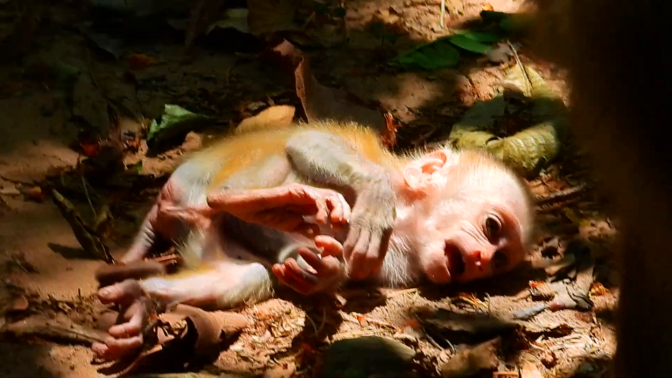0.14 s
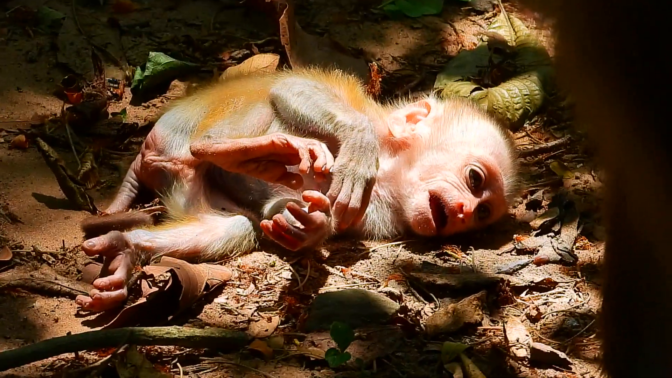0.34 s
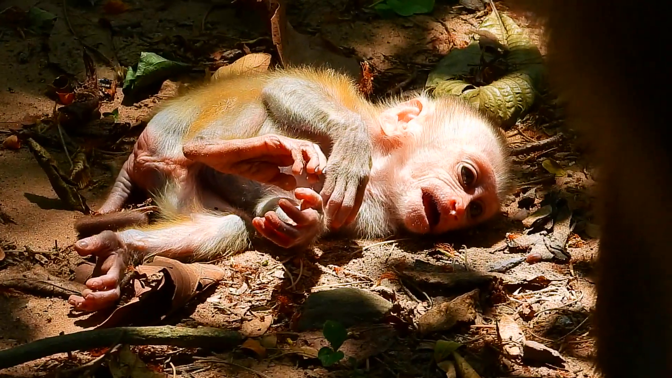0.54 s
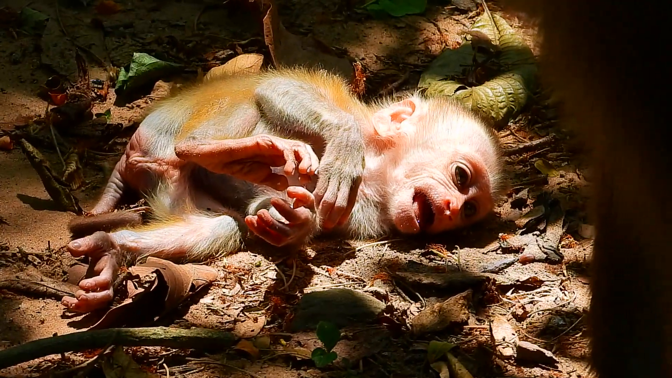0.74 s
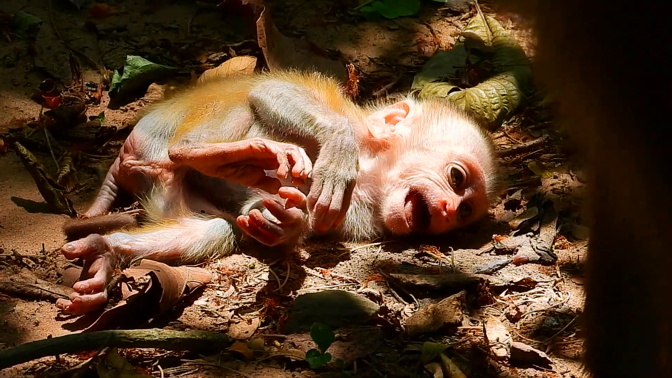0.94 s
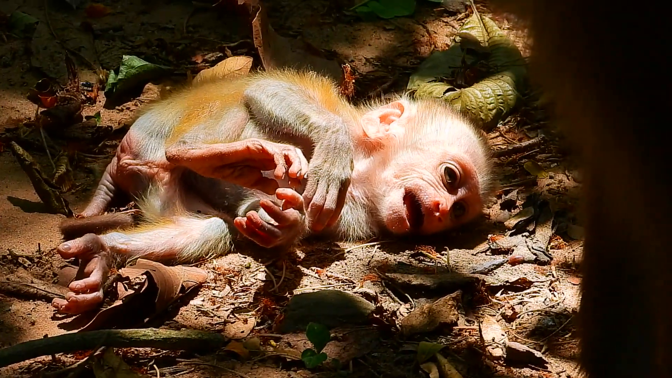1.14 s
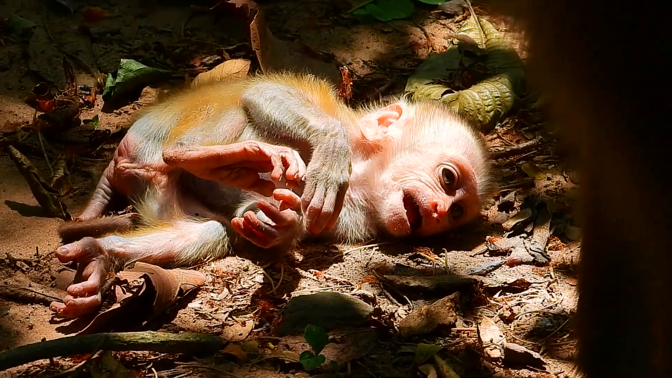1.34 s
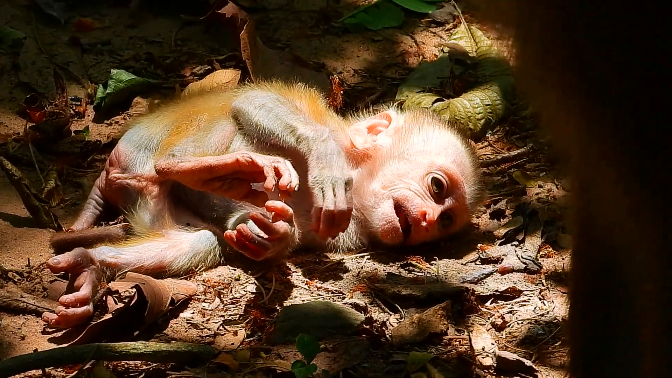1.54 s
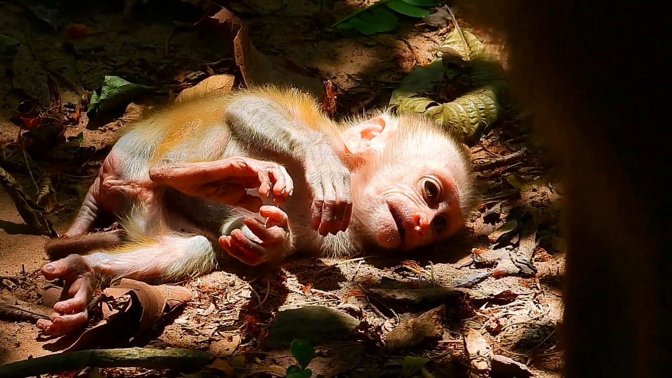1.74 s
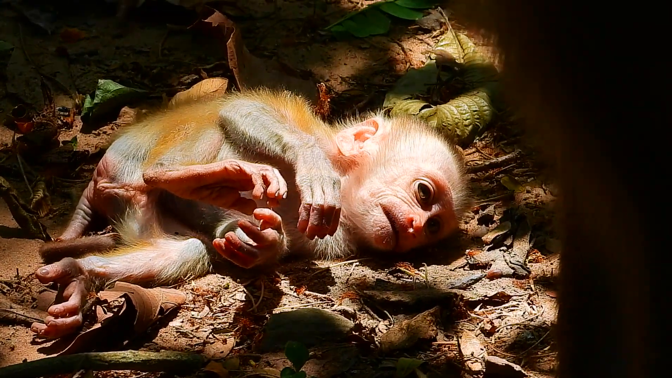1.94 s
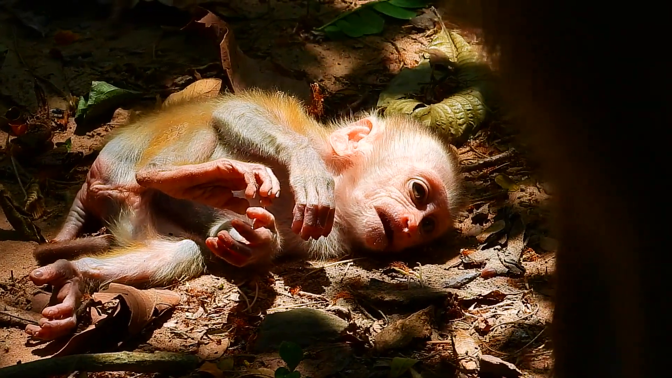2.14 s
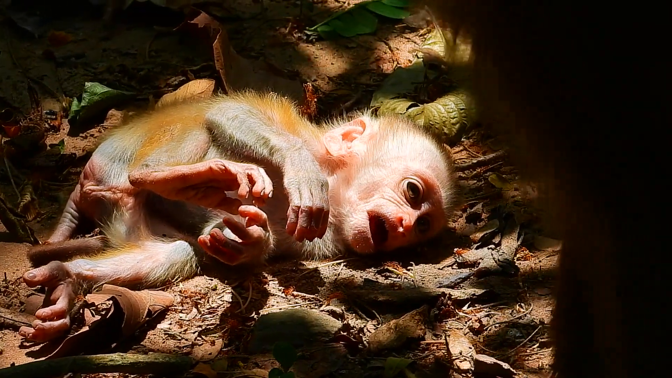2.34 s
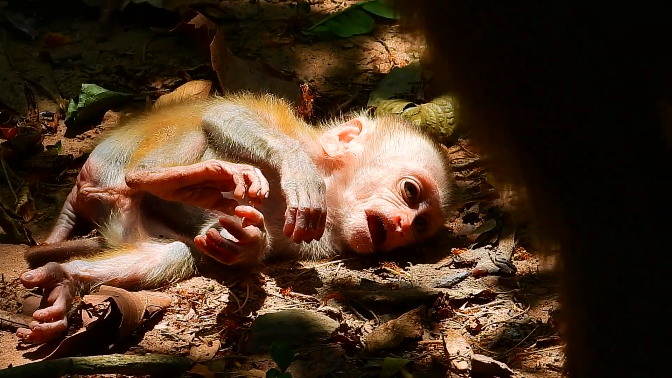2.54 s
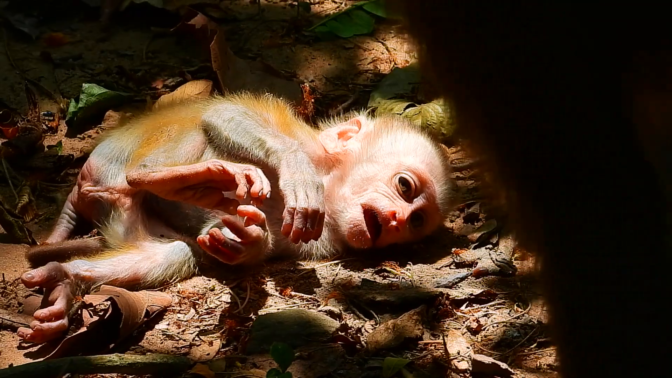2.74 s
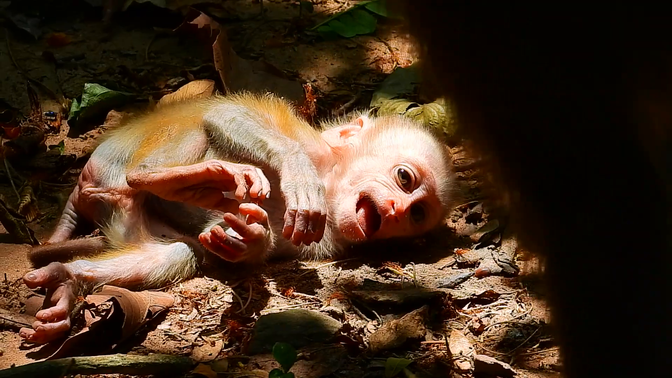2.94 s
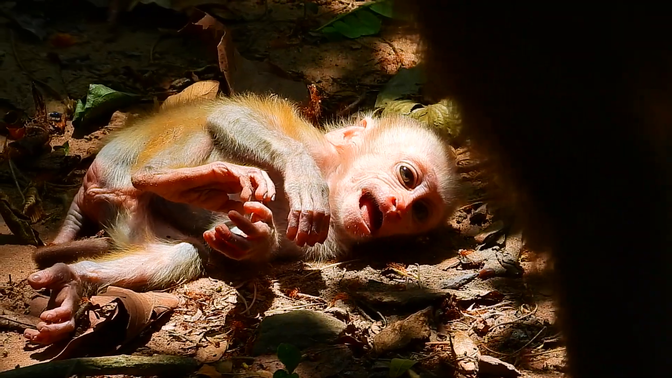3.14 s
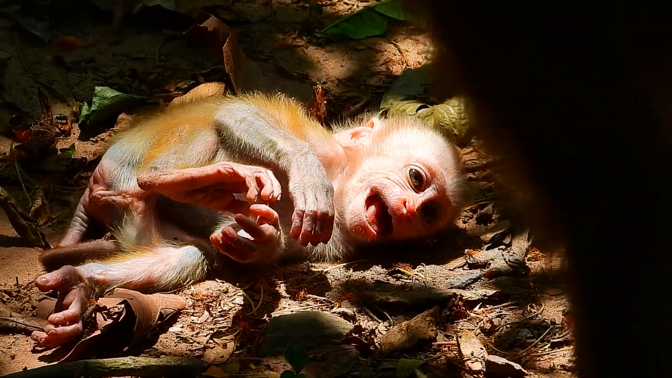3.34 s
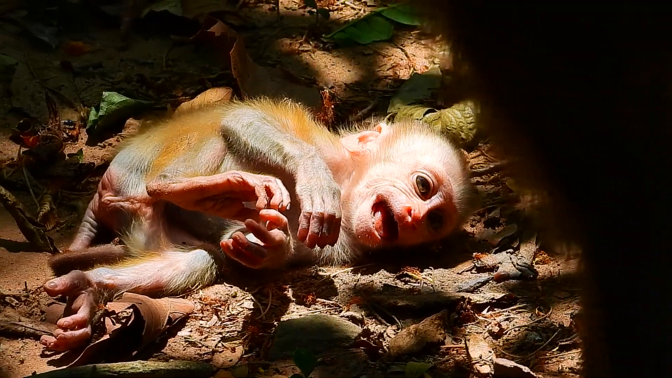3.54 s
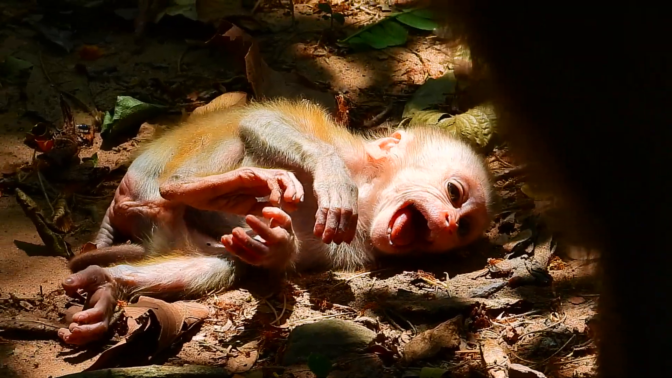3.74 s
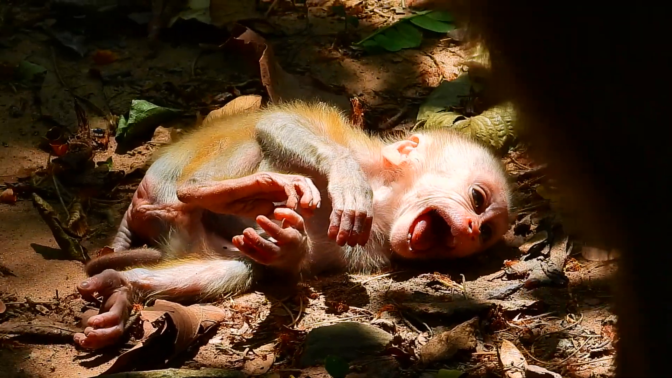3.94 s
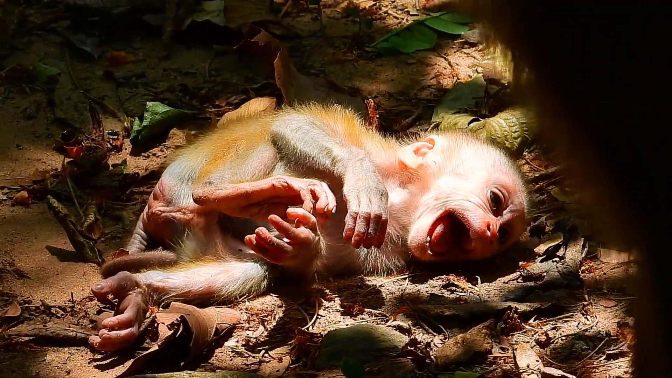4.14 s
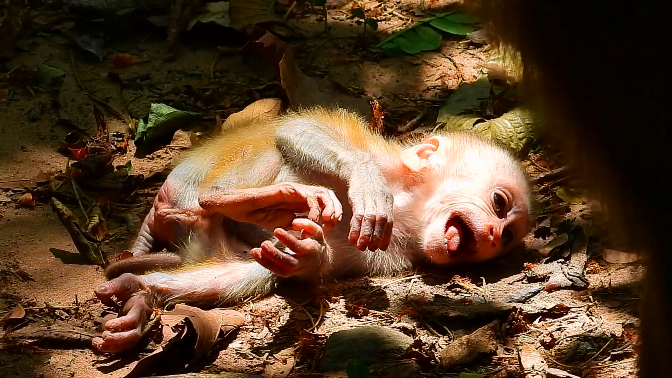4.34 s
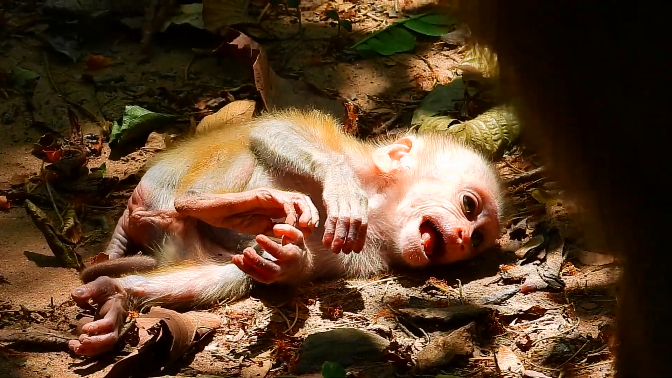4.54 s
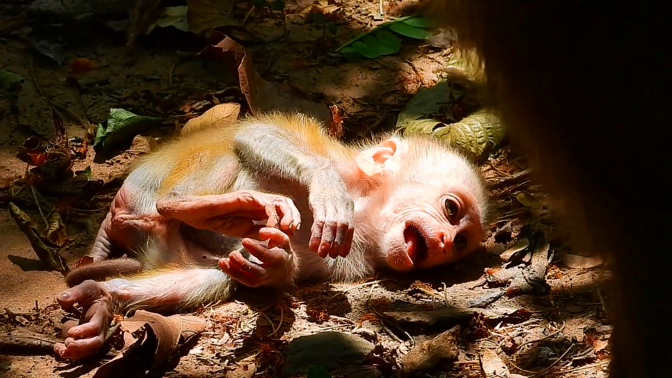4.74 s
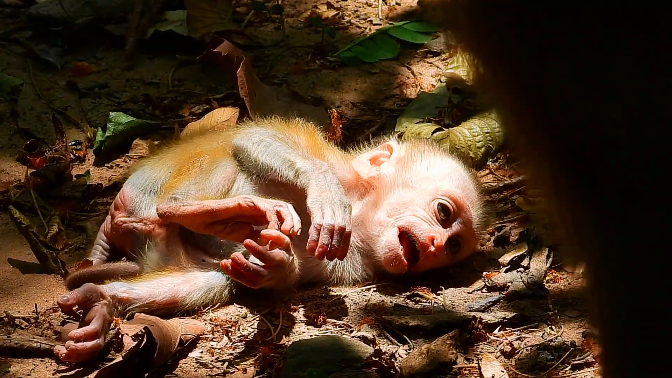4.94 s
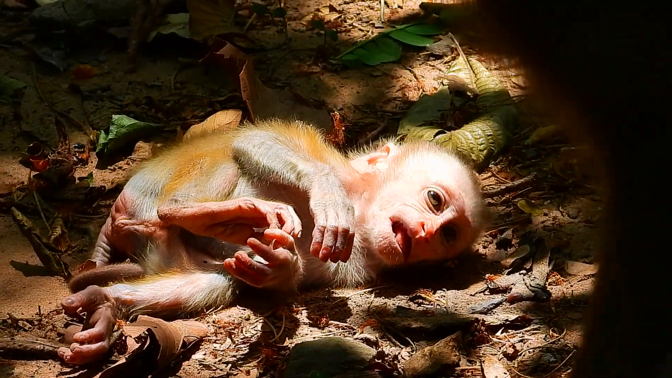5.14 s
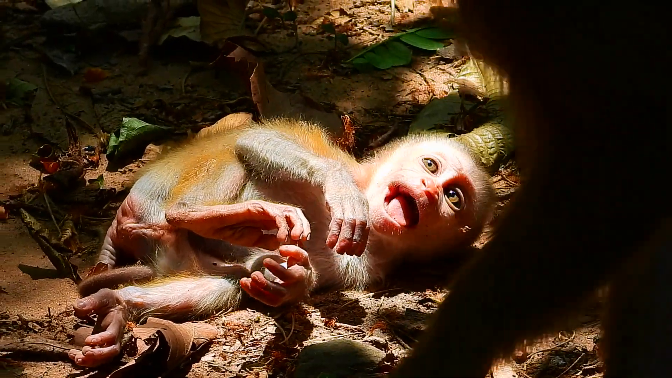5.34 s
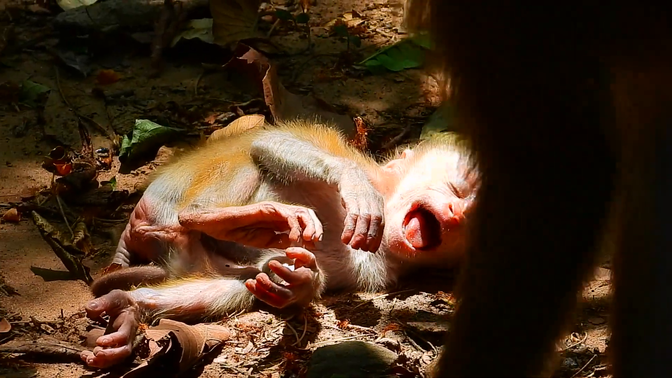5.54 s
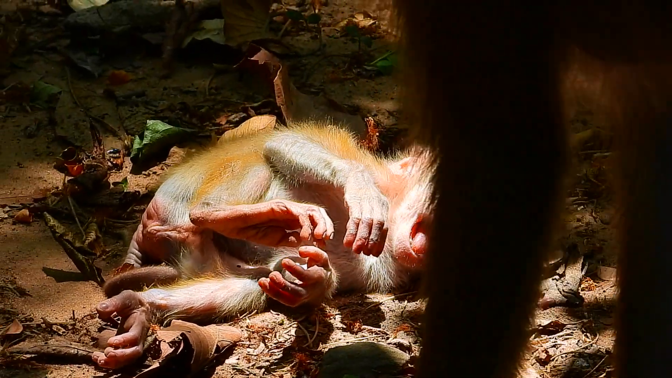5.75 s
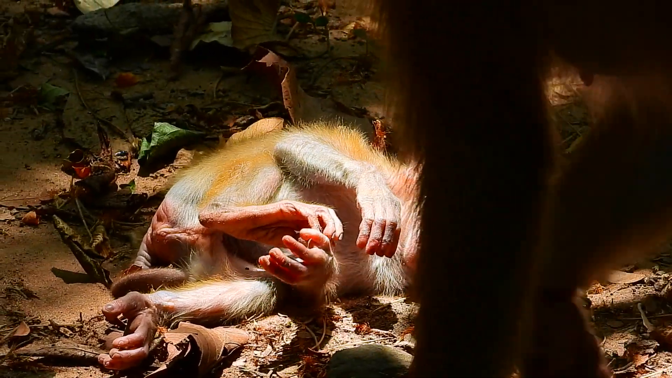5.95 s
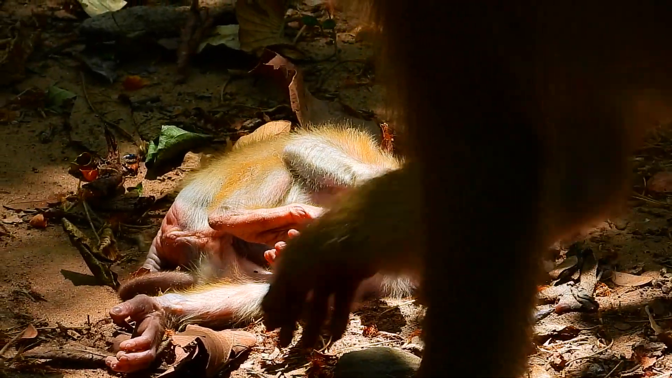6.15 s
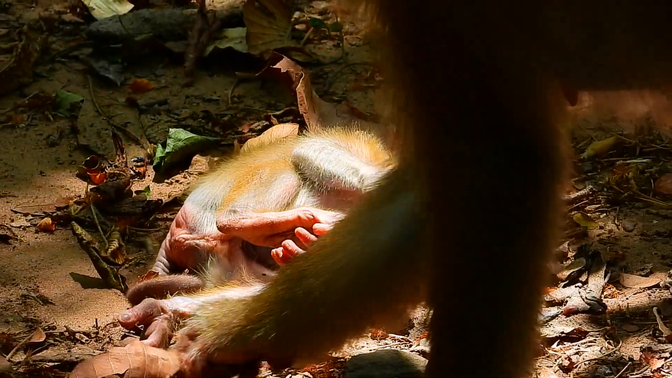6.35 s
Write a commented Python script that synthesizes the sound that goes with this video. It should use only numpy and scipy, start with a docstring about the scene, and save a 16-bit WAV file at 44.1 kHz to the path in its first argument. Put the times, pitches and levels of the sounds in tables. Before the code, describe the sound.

A forest clearing hisses softly, with a thin high insect whine and a low, throbbing engine far away. Close by, slightly left, a baby monkey grunts huskily around 0.4 and 0.6 s amid tiny leaf crackles, with a faint squeak at 0.7. A clear, piercing whistle-cry bursts out at 0.8 and falls away by 1.0. A grunt comes near 1.3, a dull twig knock at 1.5, and soft overlapping coos at 2.1-2.3. A wavering whimper runs 2.8-3.1, then a short rough shriek at 3.35. The longest scream, 3.6-4.3, soars and tears into buzzing rasps before dropping. Small grunts follow at 4.7-5.1. A shrill arched cry fills 5.3-5.6; a broken, raspy one 5.8-6.1, while an adult crunches through litter from about 5.9 to the end. Two thin falling peeps close at 6.2-6.3. The background ducks beneath loud cries and swells back; echoes are short.

```python
"""Forest floor, two microphones: a baby monkey lies close by on dry leaves, a little to the left.
It screams in shrill arches, a whistle that breaks into rasps of air and loose fold claps, with small
grunts, coos, peeps and a squeak between. Leaves crackle as clumped noise, a twig knocks, and an adult
steps past through the litter. Far off an engine thuds as a sum of blurred exhaust orders, under filtered
tree hiss and a high insect whine; this background dips during loud screams and swells back."""
import sys
import numpy as np
from scipy import signal
from scipy.fft import rfft, irfft, next_fast_len
from scipy.io import wavfile
from scipy.ndimage import uniform_filter1d

SR = 44100
rng = np.random.default_rng(int(sys.argv[2]) if len(sys.argv) > 2 else 0)


def bounce(signal):
    """Save signal as a 16-bit WAV file at the path given by the first command-line argument."""
    frames = np.transpose(np.atleast_2d(signal))
    limited = np.clip(frames, -1, 1)
    pcm = np.round(limited * 32767).astype(np.int16)
    wavfile.write(sys.argv[1], SR, pcm)


N = 281525
TIME = np.arange(N) / SR
# Table levels stand before echoes, left-right balance and background gain.


def amp(db):
    """Turns decibels into an amplitude factor."""
    return 10 ** (np.asarray(db) / 20)


def evened(x):
    """Scales to rms 1."""
    return x / np.sqrt(np.mean(x ** 2) + 1e-20)


def read(points, hz):
    """Reads a spectrum on a log-frequency axis."""
    f, value = np.transpose(points)
    return np.interp(np.log(hz + 1e-6), np.log(f), value)


def add(mix, start_s, sound):
    """Lays a sound into the mix at its start time."""
    part = mix[max(round(start_s * SR), 0):][:len(sound)]
    part += sound[:len(part)]


def span(start_s, end_s):
    """Sample times of a stretch."""
    return np.arange(start_s, end_s, 1 / SR)


def turns(hz):
    """Running phase (radians) of a changing frequency."""
    return 2 * np.pi * np.cumsum(hz) / SR


def faded(x, share):
    """Fades both ends; share is the part of the length spent fading."""
    return x * signal.windows.tukey(len(x), share)


def colour(x, points):
    """Filters by a spectrum; rms 1."""
    size = x.shape[-1]
    gain = amp(read(points, np.fft.rfftfreq(size, 1 / SR)))
    return evened(irfft(rfft(x) * gain, size))


def wander(t, hz):
    """Random drift up to a rate, over the times t; rms 1 before trimming to length."""
    size = next_fast_len(max(len(t), 1 << 13))
    f = np.fft.rfftfreq(size, 1 / SR)
    drift = irfft(rfft(rng.standard_normal(size)) / (1 + (f / hz) ** 4), size)
    return evened(drift)[:len(t)]


def hiss(t):
    """White noise over the times t."""
    return rng.standard_normal(len(t))


def patchy(x, depth_db, size, count):
    """Short-lived resonances come and go in patches two bins wide.

    Frames are size samples long; a patch lasts count frames."""
    overlap = 3 * size // 4
    z = signal.stft(x, nperseg=size, noverlap=overlap)[2]
    patches = uniform_filter1d(rng.standard_normal(z.shape[-2:]), size=2, axis=0)
    patches = uniform_filter1d(patches, size=count, axis=1)
    y = signal.istft(z * amp(depth_db * evened(patches)), nperseg=size, noverlap=overlap)[1]
    return y[..., :x.shape[-1]]


# Hiss of the trees all round: pitch_hz [Hz], relative level_db [dB]
AIR_SPECTRUM = [(30, -28), (70, -24), (150, -2.5), (300, -8), (500, -6.5), (950, -8.5), (1500, -8.5),
                (2060, -7.5), (2610, -13), (3550, -0.5), (5200, -5.5), (6870, -12), (7610, -8), (8570, -19),
                (12500, -32.5), (15000, -50)]
# Insect choruses: pitch_hz [Hz], nominal width_hz [Hz], level_db [dB]
INSECT_WHINE = [(1761, 217, -47.5), (3392, 440, -43), (7540, 270, -49)]
# Likeness of the left and right microphones: pitch_hz [Hz], likeness [-1 to 1]
LEFT_RIGHT_LIKENESS = [(100, 0.58), (300, 0.79), (1000, 0.79), (2000, 0.76), (4000, 0.56), (8000, 0.042),
                       (14000, 0.14)]


def forest(air_db=-38.5, flutter_db=0.55, patch_db=3.5):
    """Diffuse tree hiss and narrow bands of insect whine, partly alike at both microphones."""
    hz = np.fft.rfftfreq(N, 1 / SR)
    a, b = rfft(rng.standard_normal((2, N)))
    same = np.clip(read(LEFT_RIGHT_LIKENESS, hz), -1, 1)
    pair = np.array([a, same * a + np.sqrt(1 - same ** 2) * b])
    power = amp(2 * read(AIR_SPECTRUM, hz))
    power *= amp(2 * air_db) / power.mean()
    for centre, width, db in INSECT_WHINE:
        band = 1 / (1 + ((hz - centre) / (0.63 * width)) ** 2) ** 2
        power += amp(2 * db) * band / band.mean()
    air = patchy(irfft(pair * np.sqrt(power), N), patch_db, size=1024, count=10)
    return air * amp(flutter_db * wander(TIME, 5.0))


# Colour of the far exhaust pipe: pitch_hz [Hz], relative level_db [dB]
EXHAUST_SPECTRUM = [(25, -62), (70, -27), (100, -17), (123, -6), (148, -1), (173, 7), (197, 6), (222, -6),
                    (247, -7), (270, -28), (295, -6.5), (320, -8.5), (400, -37), (700, -35), (2000, -80)]
# Level of the far engine over time: time_s [s], level_db [dB]
ENGINE_COURSE = [(0, -41), (.4, -41.5), (.7, -37), (1, -42), (1.9, -42), (2.85, -41), (3.3, -48),
                 (4.2, -47), (4.65, -42.5), (5.3, -47), (6.38, -52.5)]
FIRINGS_HZ, SPEEDUP_HZ_PER_S = 24.48, .25  # starting rate; it slowly gathers speed
EXHAUST_HISS, ECHO_BLUR_RAD = .42, 1.1  # hiss relative to the hum; phase drift


def engine(swell_db=3.3):
    """Orders of a far exhaust pipe; shifting echoes blur its firings into a throbbing hum."""
    phase = turns(FIRINGS_HZ + SPEEDUP_HZ_PER_S * TIME)
    hum = np.zeros(N)
    for k in range(4, 14):
        level = amp(read(EXHAUST_SPECTRUM, k * FIRINGS_HZ) + swell_db * wander(TIME, 2.5))
        hum += level * np.cos(k * phase + ECHO_BLUR_RAD * wander(TIME, 0.44))
    sound = evened(hum) + EXHAUST_HISS * colour(hiss(TIME), EXHAUST_SPECTRUM)
    return amp(np.interp(TIME, *np.transpose(ENGINE_COURSE))) * evened(sound)


# Dips of the background: start_s [s], depth_db [dB], hold_s [s, counted from the start]
BACKGROUND_DIPS = [(0.842, 10, 0.23), (3.35, 13.5, .04), (3.684, 11, 0.64), (5.413, 12, 0.24),
                   (5.937, 13.5, 0.046)]
SINK_S, RECOVER_DB_PER_S, BACKGROUND_DB = 0.016, 9, 0.58


def sinking():
    """Gain of the background: a quick fall, a hold and a steady recovery at each dip."""
    down = []
    for s, depth_db, hold in BACKGROUND_DIPS:
        fall = np.clip((TIME - s) / SINK_S, 0, 1)
        recovered_db = RECOVER_DB_PER_S * np.maximum(TIME - s - hold, 0)
        down.append(fall * np.maximum(depth_db - recovered_db, 0))
    return amp(BACKGROUND_DB - np.max(down, axis=0))


def crackle(t, spectrum, clump_db=3):
    """Clumps of tiny snaps in dry leaves: noise whose level wanders fast."""
    return colour(hiss(t) * amp(clump_db * wander(t, 210)), spectrum)


# The adult wading through the litter: time_s [s], level_db [dB, before steps_db]
ADULT_STEPS = [(5.741, -86), (5.796, -55), (5.85, -70), (5.916, -42), (5.95, -51), (6.38, -45)]
# Colour of the litter underfoot: pitch_hz [Hz], relative level_db [dB]
LITTER_SPECTRUM = [(60, -54), (450, -3), (1000, -10.5), (3500, -17), (5000, -4.5), (6900, -1.5),
                   (8500, -4.5), (11000, -10.5), (13500, -17), (15000, -27)]


def adult_steps(steps_db=6):
    """Footfalls of the passing adult: litter noise that swells with each step."""
    out = np.zeros(N)
    s, db = np.transpose(ADULT_STEPS)
    t = span(s[0], TIME[-1])
    add(out, s[0], amp(np.interp(t, s, db) + steps_db) * crackle(t, LITTER_SPECTRUM, clump_db=0))
    return out


# Dry leaves pressed and brushed: start_s [s], length_s [s], level_db [dB]
LEAF_RUSTLES = [(0.402, 0.049, -37.5), (0.662, 0.031, -28), (0.706, 0.032, -38), (1.275, 0.098, -54),
                (2.147, 0.12, -42), (4.529, 0.11, -51.5)]
# Colour of the dry leaves: pitch_hz [Hz], relative level_db [dB]
LEAF_SPECTRUM = [(60, -38), (600, -23), (2500, 1), (4000, 8), (5700, 13.5), (7500, -1), (10000, -4.5),
                 (15000, -51)]


def rustles():
    """Short bursts of crackle from the leaves under the baby."""
    out = np.zeros(N)
    for s, length, db in LEAF_RUSTLES:
        add(out, s, amp(db) * faded(crackle(span(0, length), LEAF_SPECTRUM), .4))
    return out


# A twig knocking on the ground: start_s [s], level_db [dB]
TWIG_KNOCK = (1.502, -25.5)
# Modes of the twig: pitch_hz [Hz], relative level_db [dB], t60_s [s]
TWIG_MODES = [(500, -5, 0.037), (750, -8, 0.025), (1017, 1.5, 0.032), (1140, -4, 0.049), (1370, -5, .035),
              (2300, -15, .02)]


def knock():
    """One dull blow on dry wood: a few decaying modes with a soft onset."""
    t, out = span(0, .1), np.zeros(N)
    ring = np.zeros(len(t))
    for hz, db, t60 in TWIG_MODES:
        ring += amp(db - 60 * t / t60) * np.sin(2 * np.pi * (hz * t + rng.random()))
    start_s, level_db = TWIG_KNOCK
    add(out, start_s, amp(level_db) * ring * (1 - np.exp(-t / 0.0014)))
    return out


# Colour of the low calls: pitch_hz [Hz], relative level_db [dB]
LOW_VOICE_SPECTRUM = [(60, -44), (500, 1.5), (1100, 6), (1600, 11.5), (2300, -0.5), (3300, -3), (6000, 2.5),
                      (14000, -29)]


def low_voice(t, hz, rough):
    """The chest register: a few unsteady harmonics with a husky edge."""
    unsteady = 0.0072 * wander(t, 27.5) + (0.0015 + 0.076 * rough) * wander(t, 172)
    phase = turns(hz * (1 + unsteady))
    partials = sum(np.sin(k * phase) / np.sqrt(k) * amp(3.3 * wander(t, 17.5)) for k in range(1, 4))
    tone = colour(partials, LOW_VOICE_SPECTRUM)
    husk = colour(hiss(t), LOW_VOICE_SPECTRUM)
    return evened((1 - rough) * tone + 0.17 * rough * husk)


# Soft low calls: start_s [s], length_s [s], start pitch_hz [Hz], end pitch_hz [Hz],
# level_db [dB], roughness [0-1]
GRUNT_CALLS = [(0.394, 0.029, 1221, 1048, -33, 0.6), (0.397, 0.042, 1715, 1586, -34, 0.88),
               (0.63, 0.09, 1158, 1120, -33, 0.92), (0.798, 0.03, 995, 960, -42.5, 0.33),
               (1.265, 0.086, 1312, 973, -35.5, 0.77), (2.806, 0.029, 1864, 2300, -35, 0.6),
               (3.416, 0.027, 1320, 960, -40.5, 0.63), (3.431, 0.032, 2370, 2287, -34.5, 0.27),
               (4.732, 0.017, 1186, 1100, -33, 0.17), (4.744, 0.04, 1220, 1027, -38.5, 0.78),
               (4.909, 0.033, 1098, 1056, -44, 0.3), (5.065, 0.059, 658, 582, -42, 0.6)]


def grunts(out):
    """Short chest calls whose pitch glides in a straight line."""
    for s, length, start_hz, end_hz, db, rough in GRUNT_CALLS:
        t = span(0, length)
        voice = low_voice(t, np.linspace(start_hz, end_hz, len(t)), rough)
        add(out, s, amp(db) * faded(voice, .6))


# Two overlapping coos, one rising and one level: time_s [s], pitch_hz [Hz], level_db [dB]
COO_COURSES = [
    [(2.055, 684, -47), (2.087, 790, -37.5), (2.11, 900, -48), (2.143, 1040, -29.5), (2.172, 995, -32),
     (2.195, 1115, -32), (2.215, 1150, -33), (2.245, 1280, -43)],
    [(2.122, 1490, -51), (2.16, 1520, -49), (2.195, 1620, -49), (2.225, 1540, -40), (2.255, 1470, -39.5),
     (2.28, 1430, -40), (2.3, 1490, -47), (2.32, 1500, -54)],
]


def coos(out):
    """Smooth chest calls that follow a drawn pitch and level."""
    for course in COO_COURSES:
        s, hz, db = np.transpose(course)
        t = span(s[0], s[-1])
        add(out, s[0], amp(np.interp(t, s, db)) * low_voice(t, np.interp(t, s, hz), rough=0.12))


# Throat colour: frequency [multiple of the throat centre], relative level_db [dB]
THROAT_SPECTRUM = [(.02, -60), (.1, -52), (.135, -26), (.17, -16.5), (.23, -59), (.29, -26), (.35, -25),
                   (.44, -27), (.56, -28), (.72, -3), (.8, 0.5), (1.0, 1.5), (1.3, -2.5), (1.6, -9.5),
                   (2.2, -25), (3.2, -33)]


def throat(x, centre_hz):
    """Passes x through a throat whose resonances move together; rms 1."""
    hz, t, z = signal.stft(x, SR, nperseg=256, noverlap=192)
    centre = np.interp(t * SR, np.arange(len(x)), centre_hz)
    gain = amp(read(THROAT_SPECTRUM, hz[:, None] / centre))
    return evened(signal.istft(z * gain, SR, nperseg=256, noverlap=192)[1][:len(x)])


# Thin reedy peeps: start_s [s], length_s [s], start pitch_hz [Hz], end pitch_hz [Hz], level_db [dB]
PEEP_CALLS = [(6.217, 0.045, 2370, 2230, -39.5), (6.276, 0.044, 2380, 2180, -38)]


def peeps(out, jitter=0.0076, throat_hz=6500):
    """Soft falling calls with six equal harmonics shaped by the throat."""
    for s, length, start_hz, end_hz, db in PEEP_CALLS:
        t = span(0, length)
        phase = turns(np.linspace(start_hz, end_hz, len(t)) * (1 + jitter * wander(t, 300)))
        voice = throat(sum(np.sin(k * phase) for k in range(1, 7)), np.full(len(t), throat_hz))
        add(out, s, amp(db) * faded(voice, .6))


def fray(t, phase, width_hz=650):
    """Turbulent air around the whistle: a band of noise that follows its pitch."""
    return np.sin(phase) * wander(t, width_hz) + np.cos(phase) * wander(t, width_hz)


def whistle(t, hz, overtone_db, rough, jitter=0.0034, rough_jitter=0.0386, shimmer=0.12,
            third_db=-15, halves=0.48, flicker_db=2.0, frayed=0.27):
    """The fold edges whistle; strain unsteadies pitch and strength and doubles the period in fits."""
    slow_drift = (0.00437 + 0.017 * rough) * wander(t, 91)
    fast_drift = (jitter + rough_jitter * rough) * wander(t, 673)
    phase = turns(hz * (1 + slow_drift + fast_drift))
    # the mouth passes little of the upper partials when the pitch is very high
    mouth = 1 / (1 + (hz / 7300) ** 10)
    upper = amp(overtone_db + flicker_db * wander(t, 43)) * mouth
    third = amp(third_db) / (1 + (hz / 3800) ** 14)
    tone = np.sin(phase) + frayed * rough * fray(t, phase)
    tone += upper * (np.sin(2 * phase) + third * np.sin(3 * phase))
    fits = np.maximum(wander(t, 45) - .3, 0)
    tone += halves * rough * fits * np.sin(1.5 * phase) * mouth
    strength = 1 + (shimmer + 0.085 * rough) * wander(t, 170)
    return tone * strength / np.sqrt((1 + amp(2 * overtone_db)) / 2)


# Faint squeaks: start_s [s], length_s [s], pitch_hz [Hz, at the ends], level_db [dB]
SQUEAK_CALLS = [(0.725, 0.058, 6370, -38)]


def squeaks(out, sag=.075, rough=.2, overtone_db=-28):
    """A brief whistle whose pitch sags in the middle."""
    for s, length, hz, db in SQUEAK_CALLS:
        t = span(0, length)
        pitch = hz * (1 - sag * np.sin(np.pi * t / length))
        add(out, s, amp(db) * faded(whistle(t, pitch, overtone_db, rough), .6))


# Fits in which a slow second vibration of the folds takes over the rasp:
# start_s [s], length_s [s], start pitch_hz [Hz], end pitch_hz [Hz], share [0-1]
FOLD_BUZZES = [(3.367, 0.0098, 1680, 1824, 0.53), (3.376, .013, 1888, 1523, 0.6),
               (3.392, 0.024, 1404, 1376, 0.7), (3.451, 0.029, 2087, 2062, 0.66),
               (3.649, .03, 1103, 1371, 0.37), (3.691, 0.038, 997, 1123, 1), (3.729, .03, 1115, 1021, 0.5),
               (3.76, 0.056, 993, 1001, 0.7), (3.815, 0.028, 995, 897, 0.6),
               (3.864, 0.0214, 1012, 1027, 0.97), (3.902, .043, 1003, 1041, 0.8),
               (3.947, .0195, 1037, 985, 0.8), (5.338, .07, 1484, 1644, .6), (5.924, 0.025, 913, 912, 0.63)]
BUZZ_FADE_S = 0.0054


def buzzing(t):
    """Rate and share of the folds' slow vibration over the times t."""
    hz, share = np.full(len(t), float(FOLD_BUZZES[0][2])), np.zeros(len(t))
    for s, length, start_hz, end_hz, strength in FOLD_BUZZES:
        hz = np.where(t >= s, np.interp(t, [s, s + length], [start_hz, end_hz]), hz)
        inside_s = np.minimum(t - s, s + length - t)
        share = np.maximum(share, strength * np.clip(1 + inside_s / BUZZ_FADE_S, 0, 1))
    return hz, np.clip(share, 0, 1)


def rasp(t, centre_hz, burst_db=0.6, partial_db=1.5, smear=1.7, torn_db=2.5, chest_db=-27.0):
    """Each slow cycle claps the folds loosely and lets a puff of air through the throat."""
    buzz_hz, buzz = buzzing(t)
    stagger = (1.4 - buzz) * (.007 * wander(t, 80) + .016 * wander(t, 600))
    slow = turns(buzz_hz * (1 + stagger))
    partials = np.zeros(len(t))
    for k in range(1, 15):
        partials += np.cos(k * slow + smear * rng.standard_normal()) * amp(partial_db * wander(t, 81))
    claps = throat(partials, centre_hz)
    puffs = throat(hiss(t) * (1 + 0.66 * np.cos(slow)), centre_hz)
    voice = patchy(np.sqrt(buzz) * claps + np.sqrt(1 - buzz) * puffs, torn_db, size=256, count=5)
    # the partials trade a steady power among them
    steady = voice / np.sqrt(abs(uniform_filter1d(voice ** 2, size=350)) + 1e-9)
    # the two lowest partials sound through the chest
    even = turns(buzz_hz)
    chest = buzz * (np.sin(even) + 0.93 * np.sin(2 * even))
    return steady * amp(burst_db * wander(t, 105)) + amp(chest_db) * chest


# Strength of the octave: pitch_hz [Hz], octave over the fundamental level_db [dB, before lift and loudness]
OVERTONE_LEVEL = [(3300, 14), (3470, 10), (3560, -5), (3850, 1.5), (4200, -9.5), (4800, -17), (6300, -18),
                  (7400, -14)]
THROAT_REST_DB, THROAT_HZ_PER_DB = -19, -66  # the resonance drops as the cry gets louder than rest
PURER_DB_PER_DB = 0.53  # loud whistles carry less overtone
FIT_DEPTH, FIT_RATE_HZ = 0.087, 47  # a half-rough voice wavers between whistle and rasp


def cry(course, throat_hz, lift_db, rasp_power=3.6):
    """A whistle that gives way to a rasp as it roughens."""
    s, *columns = np.transpose(course)
    t = span(s[0], s[-1])
    hz, db, rough = (np.interp(t, s, c) for c in columns)
    rough = np.clip(rough, 0, 1)
    rough = np.clip(rough + FIT_DEPTH * np.sin(np.pi * rough) ** 2 * wander(t, FIT_RATE_HZ), 0, 1)
    louder_db = db - THROAT_REST_DB
    centre_hz = throat_hz + THROAT_HZ_PER_DB * louder_db
    overtone_db = read(OVERTONE_LEVEL, hz) + lift_db - PURER_DB_PER_DB * louder_db
    share = np.minimum(rough / .92, 1) ** rasp_power
    voice = np.sqrt(1 - share) * whistle(t, hz, overtone_db, rough)
    voice += np.sqrt(share) * rasp(t, centre_hz)
    return s[0], faded(amp(db) * voice, .03)


# The course of each cry: time_s [s], pitch_hz [Hz], level_db [dB], roughness [0-1]
CLEAR_CRY = [(.815, 3820, -35, 0.4), (.832, 4150, -26, 0.2), (.837, 4640, -21, 0.2), (.843, 4740, -11, 0),
             (.851, 4950, -13.5, 0.2), (.857, 5200, -17.5, 0), (.885, 5140, -21.5, 0),
             (.898, 4900, -23, 0.1), (.907, 5120, -21, 0), (.922, 5230, -19, 0), (.937, 5610, -26, 0.05),
             (.957, 5690, -28, 0), (.966, 5230, -19.5, .05), (.987, 4810, -27.5, 0.19),
             (1.003, 4430, -32.5, 0.37), (1.014, 3750, -37, .34)]
WHIMPER = [(2.83, 3355, -36, 0.92), (2.85, 3520, -35, .5), (2.858, 3680, -28.5, 0.18),
           (2.882, 3695, -25.5, 0.22), (2.908, 3405, -33.5, .12), (2.93, 3600, -35, .05),
           (2.955, 3580, -32, .05), (2.975, 3380, -43, .12), (3.0, 3330, -43, .12), (3.02, 3600, -36, 0.25),
           (3.034, 4160, -26.5, 0.32), (3.046, 3650, -33, 0.35), (3.058, 3680, -33, 0.32),
           (3.076, 4300, -27.5, .1), (3.098, 4020, -21, .3), (3.12, 3620, -34.5, .23),
           (3.134, 2840, -47, .23)]
SHRIEK = [(3.333, 3390, -34, .6), (3.338, 3405, -28, 0.65), (3.342, 3325, -20, 0.51),
          (3.349, 3514, -18.5, 0.44), (3.353, 3860, -20, .4), (3.357, 4130, -10, 0.27),
          (3.364, 4340, -19, .4), (3.368, 5070, -20, 0.66), (3.377, 5560, -16.5, 0.59),
          (3.384, 5110, -19.5, .5), (3.39, 4554, -16, 0.66), (3.397, 4285, -20.5, 0.9),
          (3.412, 4190, -20.5, 0.92), (3.416, 5280, -18, 0.82), (3.425, 5180, -24, 0.33),
          (3.43, 4750, -27, .99), (3.443, 4150, -35, 0.58), (3.456, 4154, -20.5, .78),
          (3.473, 4230, -35, 0.64), (3.488, 3980, -54, .8)]
LONG_SCREAM = [(3.622, 4590, -28, 0.087), (3.638, 5150, -27, 0.35), (3.646, 5520, -23.5, 0.39),
               (3.651, 6600, -25, 0.45), (3.666, 7280, -21.5, 0.43), (3.68, 8080, -29.5, 0.64),
               (3.688, 8250, -25.5, 0.73), (3.695, 8050, -24, 1), (3.712, 8260, -25, 1),
               (3.72, 5400, -21, 1), (3.735, 5500, -19.5, 0.92), (3.75, 5300, -19, 0.8),
               (3.764, 5020, -23, 0.92), (3.808, 4960, -20.5, 0.98), (3.822, 8050, -29.5, 0.88),
               (3.836, 8140, -27, 0.89), (3.843, 8080, -30, 0.47), (3.858, 8020, -32, 0.63),
               (3.866, 7930, -30, 0.91), (3.882, 8040, -30.5, 0.89), (3.892, 8000, -36, 0.71),
               (3.904, 8050, -28.5, 0.98), (3.948, 8370, -26, 0.98), (3.963, 8060, -28, 0.81),
               (3.974, 7510, -34, 0.45), (3.992, 7130, -33, 0.37), (4.0, 6730, -34, 0.57),
               (4.022, 6630, -29, 0.16), (4.03, 6600, -32, .25), (4.037, 6390, -32, 0.98),
               (4.062, 6270, -32.5, 0.45), (4.08, 6100, -31.5, 0.73), (4.099, 6400, -32, .42),
               (4.108, 6450, -27.5, 0.89), (4.124, 6490, -31, 0.99), (4.134, 6520, -29, 0.42),
               (4.148, 6500, -27.5, 0.48), (4.172, 6570, -31, 0.98), (4.235, 6840, -29.5, 0.97),
               (4.244, 7500, -28, 0.6), (4.255, 7000, -27.5, 0.6), (4.262, 6600, -27.5, 0.9),
               (4.284, 6440, -26, 0.49), (4.306, 5170, -22.5, 0.21), (4.314, 4750, -41, .2),
               (4.326, 4550, -35, 0.28)]
ARCHED_CRY = [(5.312, 3900, -34, 0.29), (5.328, 4480, -24.5, 0.3), (5.333, 4770, -16.5, 0.17),
              (5.349, 5940, -15, .44), (5.37, 6410, -23.5, 0.54), (5.39, 6300, -24.5, .45),
              (5.409, 6180, -32, 0.74), (5.426, 6670, -17.5, 0.36), (5.433, 7260, -19, 0.18),
              (5.457, 7070, -25, .18), (5.465, 6650, -22, .35), (5.48, 7040, -22, 0.16),
              (5.497, 6690, -17.5, .28), (5.513, 6320, -27, 0.46), (5.528, 6600, -19.5, 0.18),
              (5.572, 5900, -25, .3), (5.595, 5120, -20, 0.12), (5.608, 4830, -24.5, .25),
              (5.616, 4780, -45, .3)]
BROKEN_CRY = [(5.778, 3500, -39, 0.44), (5.797, 4620, -26.5, 0.3), (5.812, 4920, -27, 0.53),
              (5.824, 5500, -34.5, .82), (5.848, 6000, -40.5, 0.86), (5.87, 5300, -34.5, 0.9),
              (5.884, 5700, -31.5, .4), (5.902, 5320, -29, .2), (5.917, 5350, -24, .25),
              (5.923, 6000, -26, 0.88), (5.93, 6200, -22, 0.97), (5.95, 5900, -22, 0.92),
              (5.962, 5200, -19, 0.76), (5.984, 5700, -22, 0.66), (6.002, 6100, -26, 0.67),
              (6.008, 6600, -21, 0.26), (6.017, 6300, -24, 0.45), (6.023, 6200, -22, .3),
              (6.036, 5800, -28, 0.5), (6.052, 5950, -34, 0.56), (6.085, 5800, -49, .8)]
# Each cry with its voice: course, throat resonance_hz [Hz, at the resting level], overtone lift_db [dB]
CRIES = [(CLEAR_CRY, 7300, 0), (WHIMPER, 4900, 0), (SHRIEK, 4900, -3.8), (LONG_SCREAM, 6190, 0),
         (ARCHED_CRY, 6300, -6), (BROKEN_CRY, 5950, -6)]


def screams(out):
    """The loud cries, each with its own throat."""
    for course, throat_hz, lift_db in CRIES:
        add(out, *cry(course, throat_hz, lift_db))


def monkey():
    """All calls of the baby: its folds whistle, rasp or hum, and its throat colours them."""
    out = np.zeros(N)
    for calls in (grunts, coos, peeps, squeaks, screams):
        calls(out)
    return out


# Echoes off the ground and a tree trunk: left delay_s [s], right delay_s [s], level_db [dB, before colour]
GROUND_BOUNCES = [(.00113, 0.0018, -18.5), (.0021, 0.0036, -24), (0.041, .0465, -40.5)]
# The mouth beams its treble at the ground: pitch_hz [Hz], echo level_db [dB]
ECHO_SPECTRUM = [(1000, 3.5), (5000, 2.5), (8000, -0.5), (12000, 4.5), (15500, -1)]
# Phase between the microphones: pitch_hz [Hz], lead of the left [radians]
LEFT_LEAD = [(300, 0), (3200, 1.55), (5200, 0.66), (7500, 1.36), (12000, 1.04)]


def clearing(x, early_db=-10, tail_db=-18, early_s=0.022, t60=0.41):
    """Quick echoes off ground and trunks, then a faint tail from the trees.

    The direct sound meets the two microphones out of step."""
    t = np.arange(SR // 2) / SR
    taps = rng.choice([-1., 1.], (2, len(t))) * (t > .001)
    near = taps * (rng.random(taps.shape) < .02) * np.exp(-t / early_s)
    far = taps * (rng.random(taps.shape) < .05) * amp(-60 * t / t60) * (t > .012)
    echo = np.zeros(taps.shape)
    for db, h in ((early_db, near), (tail_db, far)):
        echo += amp(db) * h / np.linalg.norm(h, axis=1, keepdims=True)
    for left_s, right_s, db in GROUND_BOUNCES:
        add(echo[0], left_s, amp([db]))
        add(echo[1], right_s, amp([db]))
    lead = read(LEFT_LEAD, np.fft.rfftfreq(N, 1 / SR))
    direct = irfft(rfft(x) * np.exp(.5j * np.array([lead, -lead])), N)
    gain = amp(read(ECHO_SPECTRUM, np.fft.rfftfreq(SR, 1 / SR)))
    echo = irfft(rfft(echo, SR) * gain, SR)[:, :len(t)]
    return direct + signal.oaconvolve(x[None], echo, axes=1)[:, :N]


def scene():
    """The monkey close by and a little to the left, the background behind."""
    background = sinking() * (forest() * amp([[1.8], [-1.8]]) + engine())
    close = clearing(adult_steps() + rustles() + knock() + monkey())
    return background + close * amp([[2.3], [-2.0]])


def record(dry, edge_hz=15600):
    """The band limit of the recorder: a steep low-pass."""
    lowpass = signal.firwin(511, edge_hz, window=("kaiser", 9), fs=SR)
    return signal.oaconvolve(dry, lowpass[None], "same")


dry = scene()
out = record(dry)
bounce(out)
```